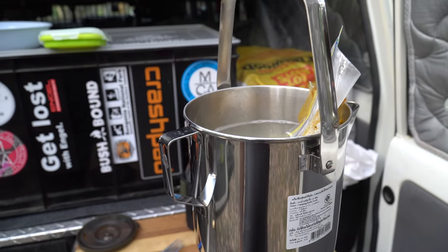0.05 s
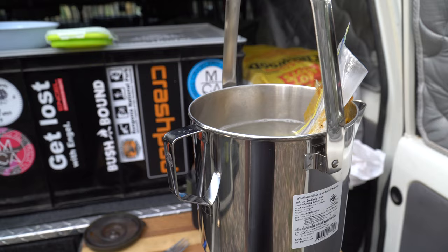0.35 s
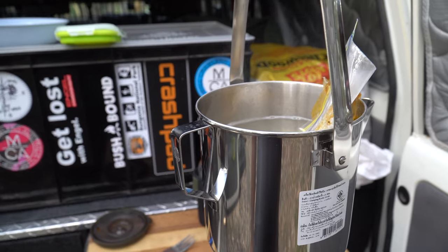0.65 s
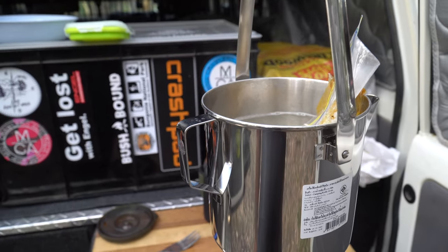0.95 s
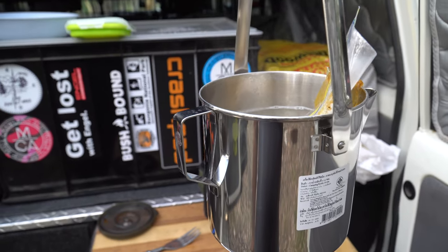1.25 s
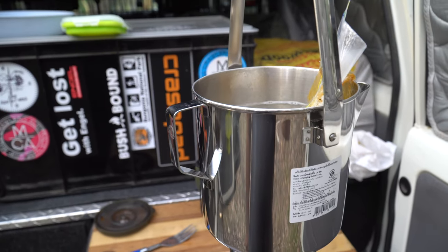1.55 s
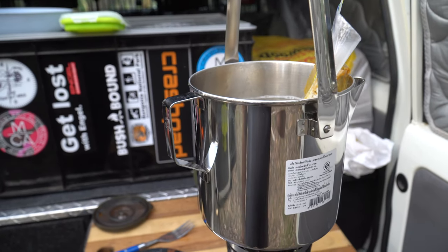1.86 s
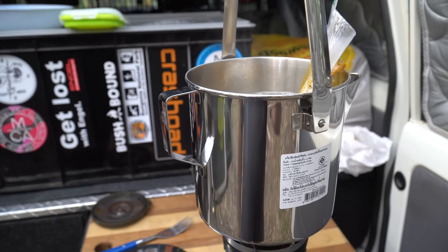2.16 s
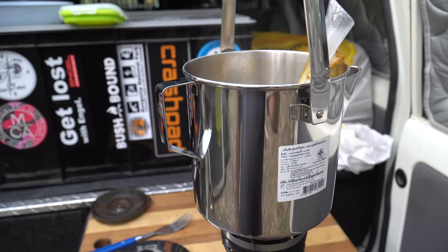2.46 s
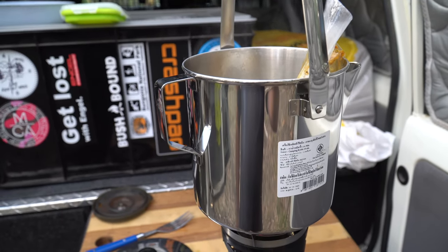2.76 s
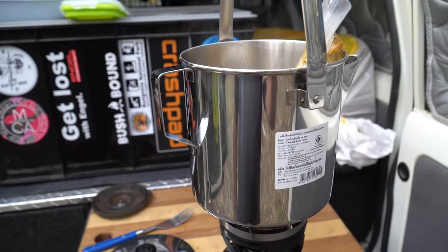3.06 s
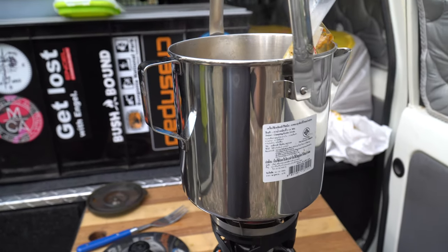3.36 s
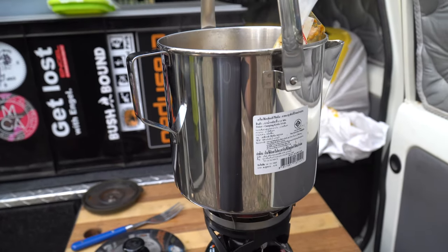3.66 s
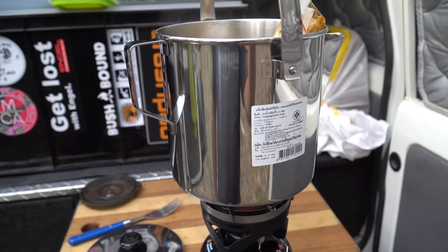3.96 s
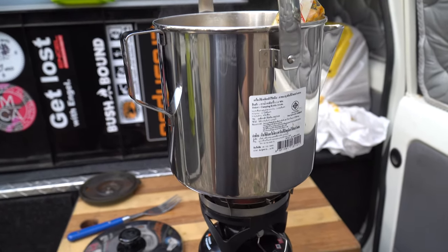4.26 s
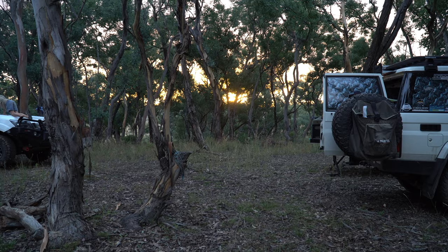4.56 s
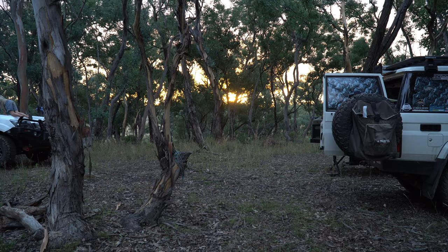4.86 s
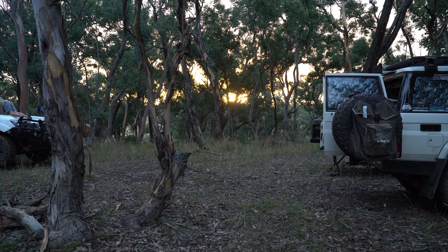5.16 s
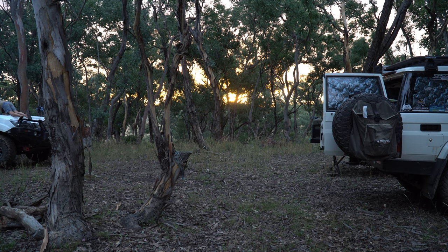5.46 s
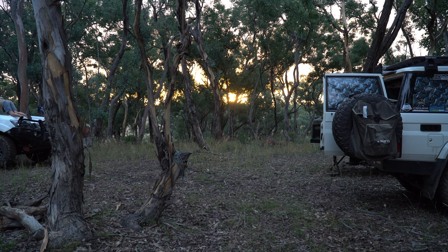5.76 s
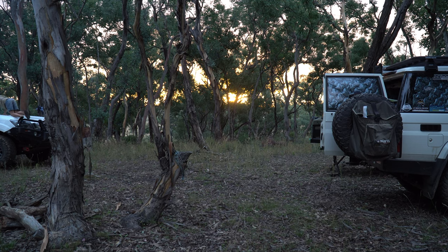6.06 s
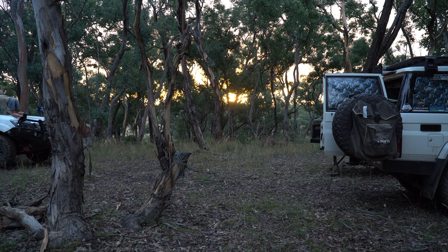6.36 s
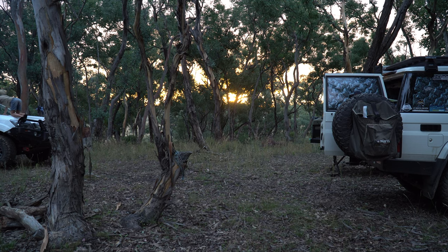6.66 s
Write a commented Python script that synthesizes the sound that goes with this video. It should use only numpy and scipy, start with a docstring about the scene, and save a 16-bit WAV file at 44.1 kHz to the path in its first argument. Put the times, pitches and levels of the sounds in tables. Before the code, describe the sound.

At a bush camp, a gas stove burns close to the moving microphone with a steady roar, a bright hiss, a wavering low drone and small pops. Crickets and a far bird sit behind it. After a sudden cut, a much quieter clearing is filled with pulsing crickets. A faint bird call and a soft bump on the microphone come next, then light rustling and small twig snaps in dry leaf litter.

```python
"""A gas burner roars, hisses and drones under a steel pot at a bush camp, over a bed of crickets.
The flame pulses and sputters, a distant bird calls, the hiss shifts colour as the microphone drifts
past the pot, and a deep flutter passes. At 4.6 s, a faint low rumble spans a hard cut to the quiet
clearing: crickets stroke their wings, one close by, and dry leaves stir. The bird calls again, more
faintly, a soft double bump follows, then grass swishes and twigs snap."""
import sys
import numpy as np
from scipy import signal
from scipy.fft import rfft, irfft, next_fast_len
from scipy.io import wavfile
from scipy.ndimage import map_coordinates

SR = 44100
rng = np.random.default_rng(int(sys.argv[2]) if len(sys.argv) > 2 else 0)


def file_out(sig):
    """Save sig as 16-bit WAV at sys.argv[1]."""
    # one column per channel
    cols = np.atleast_2d(sig).T
    # limit, then scale
    lim = np.clip(cols, -1, 1)
    pcm = np.round(lim * 32767).astype(np.int16)
    wavfile.write(sys.argv[1], SR, pcm)


N = 295911
T = np.arange(N) / SR
CUT_S = 4.576  # the burner gives way to the clearing

# burner faders, dipping as the microphone passes the pot: time_s, roar_db, hiss_db
BURNER_LEVELS = [(0, -27.4, -37), (1.1, -27.2, -36.6), (1.6, -26.4, -36.1), (2.35, -26.8, -35.5),
                 (2.8, -29, -37.7), (3.4, -29.2, -38), (4.1, -27.6, -37.2), (4.55, -27.6, -36.1)]
# tone of the combustion roar: frequency_hz, relative_db
ROAR_SPECTRUM = [(20, -0.5), (34, 0.5), (46, 0.5), (65, -4.5), (110, 2.5), (190, -2.5), (260, -3),
                 (370, -4.5), (500, -10.5), (770, -9), (1150, -12), (1600, -18), (2400, -16), (3300, -24),
                 (4500, -23), (8000, -56)]
# peaks and notches of housing and pot: centre_hz, width_hz, lift_db
HOUSING_RESONANCES = [(244.6, 61, 5), (397, 130, 2.5), (483, 45, -8.5), (520, 22, 4.5), (580, 72, -6),
                      (736, 280, 5.5), (951, 88, -12.5), (1115, 250, 3), (1680, 160, -1.5), (2106, 55, 5.5)]
# tone of the gas jet: frequency_hz, relative_db
JET_SPECTRUM = [(2200, -9), (3200, -8.5), (4200, 11), (5000, 3), (5600, 10), (6200, 9.5), (6800, 5.5),
                (7300, 5.5), (8300, 0), (9700, -3), (10500, 0.5), (12600, -4.5), (13600, -5.5),
                (14100, -11), (15700, -14)]
# bounces off pot, stove and table: first_delay_s, last_delay_s, first_relative_gain, last_relative_gain
JET_ECHOES = [(.000296, .000317, .17, -.07), (.00041, .000407, .03, -.15), (.000632, .000623, -.14, -.13),
              (.000809, .000794, -.11, -.11), (.000893, .000875, .12, .19), (.001049, .001058, .07, .11),
              (.00116, .001091, -.13, .04), (.001406, .001439, .12, .06), (.001784, .001823, -.18, .05),
              (.002144, .002258, .23, -.07), (.0028, .00297, .11, .07), (.00315, .00333, .03, .16)]
# spells of flame pulsing: start_s, length_s, relative_db
PULSE_SPELLS = [(0, 0.7, -10.5), (0.806, .16, -6), (1.193, 1.58, -6.5), (3.038, .46, -6.5),
                (3.65, .82, -13.5)]
# swells of the housing drone: start_s, length_s, level_db
DRONE_SWELLS = [(.3, 0.53, -36.5), (1.196, 0.39, -30.5), (2.11, 0.23, -32), (2.694, 0.37, -36.5),
                (4.15, .4, -34.5)]
# the drone's wavering note: time_s, pitch_hz
DRONE_NOTE = [(.4, 130), (.85, 120), (1.35, 131), (1.9, 124), (2.2, 132.4), (2.5, 124.4), (4.1, 128.2),
              (4.5, 142.9)]
# featured pops of the flame: time_s, peak_db, centre_hz
FLAME_POPS = [(.538, -17, 704), (0.737, -20, 556), (.951, -12.5, 766), (1.047, -15.5, 715),
              (1.189, -20.5, 804), (1.525, -24.5, 1800), (1.69, -20, 782), (1.858, -21, 2960),
              (2.024, -20, 599), (2.364, -23, 564), (2.46, -17, 730), (2.474, -23, 1990), (2.665, -18, 313),
              (3.116, -17, 766), (3.155, -20.5, 1643), (3.575, -24, 718), (3.885, -23, 950)]
# housing and jet resonances, loudest in passing: pass_s, level_db, pitch_hz, glide_hz_per_s, fade_db_per_s
PASSING_WHISTLES = [(2.85, -39.5, 358, 0, 12), (.5, -44.5, 6970, -15, 6), (2.0, -41, 6880, -25, 6),
                    (1.1, -43.5, 6520, 0, 4), (2.0, -51, 9200, -150, 7), (.6, -53.5, 10280, -30, 8),
                    (1.9, -50.5, 10480, 0, 14), (3.1, -55, 10300, -100, 12), (3.9, -51.5, 10540, -140, 9),
                    (3.6, -47.5, 5740, -30, 5), (4.4, -54, 8320, -60, 12), (4.4, -58, 13400, -60, 12)]
# fader of the crickets behind the stove: time_s, relative_db
STOVE_CHORUS_LEVELS = [(0, -31), (2.3, -32), (3.5, -35), (4.55, -33)]
# tempo of the nearest cricket: time_s, strokes_per_s
WING_TEMPO = [(4.593, 20.33), (5.65, 20.33), (5.8, 20.05), (6.7, 20.05)]
# distant bird calls: lowest_pitch_time_s, lowest_pitch_hz, level_db
BIRD_CALLS = [(.685, 1324, -36), (5.625, 1290, -50.5)]
# tone of the leaf litter: frequency_hz, relative_db
LEAF_SPECTRUM = [(100, 11.5), (400, 3.5), (700, -0.5), (1250, 3), (1900, -1), (2600, 2.5), (3400, 5.5),
                 (4700, -7), (5400, -3), (6000, -8), (6700, -16.5), (9000, -21), (12000, -15), (15700, -29)]
# rustles in the litter: start_s, length_s, relative_db
LEAF_RUSTLES = [(4.583, 0.29, -68), (5.294, 0.24, -57), (5.738, .22, -57), (6.14, .38, -55.5),
                (6.594, .12, -58.5)]
# tone of dry grass: frequency_hz, relative_db
GRASS_SPECTRUM = [(3000, -19), (5000, 1), (5500, 0), (6500, -16), (12000, -18), (15700, -28)]
# one bright swish of grass: start_s, length_s, level_db
GRASS_SWISH = (6.1, 0.11, -55)
# dry twigs and leaves snapping: time_s, peak_db, centre_hz
TWIG_SNAPS = [(5.067, -43.5, 400), (5.851, -37, 5560), (6.195, -46, 5500), (6.257, -40, 1400),
              (6.289, -40, 2000), (6.381, -45, 1490), (6.396, -37, 1390), (6.403, -34, 1390),
              (6.521, -42, 2500), (6.612, -43, 5500), (6.643, -43, 1500), (6.685, -39, 1200)]
# the two hits of the soft bump: start_s, level_db, decay_s
BUMP_HITS = [(5.749, -29.5, 0.02), (5.772, -32, 0.017)]
# dull tone of the bump: frequency_hz, relative_db
BUMP_SPECTRUM = [(25, 14), (60, 2), (130, 7), (230, 1), (370, 1), (600, -9), (1100, -7), (2000, -15),
                 (3000, -7), (5500, -20), (8000, -37), (15000, -42)]
# deep flutters, one at the stove and a faint one across the cut: start_s, length_s, level_db
DEEP_FLUTTERS = [(2.46, 0.15, -23.5), (4.56, 0.12, -39)]
# tone of the clearing's air: frequency_hz, relative_db
AIR_SPECTRUM = [(25, 12.5), (55, 10), (100, 1.5), (300, 0.5), (600, -4), (1200, -6), (2000, -11),
                (3000, -9.5), (4800, -8), (6500, -22), (12000, -18.5), (15700, -29)]


def roar():
    """Turbulent combustion roars through the housing with a quick flutter."""
    flutter_db = 0.66 * wander(43) + 0.37 * wander(6.4)
    return amp(follow(BURNER_LEVELS)) * unit(noise(ROAR_SPECTRUM, HOUSING_RESONANCES) * amp(flutter_db))


def hiss(echo_strength=0.75):
    """Gas leaves the jet; short echoes comb-filter it, and the teeth slide as the microphone moves."""
    jet, travel = noise(JET_SPECTRUM), np.minimum(T / CUT_S, 1)
    for first_s, last_s, first_gain, last_gain in JET_ECHOES:
        delay_s = first_s + (last_s - first_s) * travel
        gain = echo_strength * (first_gain + (last_gain - first_gain) * travel)
        jet = jet + gain * map_coordinates(jet, [(T - delay_s) * SR], order=5)
    return amp(follow(BURNER_LEVELS, column=2) + 0.67 * wander(40)) * unit(jet)


def flicker(rate_hz=11.3, unsteadiness=0.141, trim_db=-.5):
    """The whole flame pulses in spells: a pressure wave below hearing."""
    turns = np.cumsum(rate_hz * (1 + unsteadiness * wander(8.3))) / SR
    strength = swells(PULSE_SPELLS, attack_s=0.073, release_s=0.12)
    return amp(trim_db + 1.6 * wander(10.4)) * strength * np.sin(2 * np.pi * turns)


def drone(width_hz=27, octave_db=-17, rest_db=-39):
    """The flame drives the air in the housing into an unsteady, swelling note with a weak octave."""
    strength = amp(rest_db) + swells(DRONE_SWELLS, attack_s=.12, release_s=0.096)
    hz = follow(DRONE_NOTE)
    return strength * (fuzzy_note(hz, width_hz) + amp(octave_db) * fuzzy_note(2 * hz, 2 * width_hz))


def sputters(small_count=60, small_db=-29):
    """Pockets of gas catch with a soft pop: a few large, many small."""
    out = np.zeros(N)
    for s, db, hz in FLAME_POPS:
        add(out, s - .002, amp(db) * burst(hz, decay_s=0.0015, spread=0.49))
    for when, size, pitch in rng.random((small_count, 3)):
        pop = burst(500 + 500 * pitch, decay_s=0.0027, spread=0.38)
        add(out, when * CUT_S, amp(small_db + 2.9 * size) * pop)
    return out


def whistles():
    """Narrow resonances sing out of the noise, gliding and fading as the microphone moves on."""
    out = np.zeros(N)
    for s, db, hz, glide, fade in PASSING_WHISTLES:
        width_hz = 70 * (hz / 7000) ** .35  # higher ones are wider
        out += amp(db - fade * abs(T - s)) * fuzzy_note(hz + glide * (T - s), width_hz)
    return out


def crickets_at_stove():
    """The bed of crickets behind the burner."""
    bed = chorus(4115, spread_hz=500, fall=.11, duty=.32, edge_drop_db=19, wet=0.56, overtone_db=-39)
    return amp(follow(STOVE_CHORUS_LEVELS) + 1.5) * bed


def crickets_in_clearing(bed_db=-38.5, rise_db_per_s=2):
    """A swelling chorus, with one lower-pitched cricket up close and a fainter, deeper one."""
    bed = chorus(4050, spread_hz=390, fall=0.097, duty=.3, edge_drop_db=14, wet=0.3, overtone_db=-36)
    far = amp(bed_db + rise_db_per_s * (T - CUT_S)) * bed
    strokes = np.cumsum(follow(WING_TEMPO)) / SR
    strokes -= np.interp(WING_TEMPO[0][0], T, strokes)  # a stroke lands on the first cue
    near = amp(-38) * cricket(strokes, 3710, fall=0.137, duty=0.37, overtone_db=-26)
    deep = amp(-48) * cricket(19.2 * T, 3370, fall=0.13, duty=.5)
    return far + trees(near + deep, t60_s=0.46, wet=0.73)


def chorus(centre_hz, spread_hz, fall, duty, edge_drop_db, wet, overtone_db, count=32):
    """Crickets near and far stridulate out of step at nearly one tempo, each on its own pitch."""
    out, drift = np.zeros(N), wander(1.5)
    places = np.linspace(-1, 1, count)  # from the lowest voice to the highest
    starts = np.arange(count) * (np.sqrt(5) - 1) / 2  # spread evenly over one stroke
    for place, start, (pace, shift) in zip(places, starts, rng.random((count, 2))):
        strokes_per_s = 19.4 + .08 * (pace - .5)
        strokes = start + strokes_per_s * T + .05 * np.roll(drift, int(shift * N))
        voice = cricket(strokes, centre_hz + spread_hz * place, fall, duty, overtone_db)
        out += amp(-edge_drop_db * place ** 2) * voice
    return unit(trees(out, t60_s=1.0, wet=wet))


def cricket(strokes, hz, fall, duty, overtone_db=-60):
    """Each wing stroke is one tone pulse that sinks in pitch as the wing slows; no two are quite alike."""
    sounding = abs((strokes + .5) % 1 - .5) < duty / 2
    number = np.round(strokes[sounding]).astype(int)
    progress = (strokes[sounding] - number) / duty  # -0.5 to 0.5 across a pulse
    start, detune, size = rng.standard_normal((512, 3))[number].T
    pitch_hz = hz * (1 + .008 * detune - fall * progress)
    phase = 2 * np.pi * (start + np.cumsum(pitch_hz) / SR)
    tone = np.sin(phase) + amp(overtone_db) * np.sin(2 * phase)
    out = np.zeros(N)
    out[sounding] = amp(1.4 * size) * np.cos(np.pi * progress) * tone
    return out


def bird(length_s=0.17, lead_s=.13, scoop_hz_per_s2=52000, hoarseness=.05):
    """A hoarse whistle scoops down as it swells and fades, blurred by the trees."""
    out, t = np.zeros(N), np.arange(0, length_s, 1 / SR)
    for s, low_hz, db in BIRD_CALLS:
        scoop_hz = low_hz + scoop_hz_per_s2 * (t - lead_s) ** 2
        hz = scoop_hz * (1 + hoarseness * wander(370)[:len(t)])
        arch = np.sin(np.pi * t / length_s)
        add(out, s - lead_s, amp(db) * arch * np.sin(2 * np.pi * np.cumsum(hz) / SR))
    return trees(out, t60_s=1.0, wet=0.87)


def undergrowth():
    """Leaf litter stirs faintly and rustles now and then; grass swishes and twigs snap."""
    stir = amp(-67) + swells(LEAF_RUSTLES, attack_s=0.1, release_s=0.046)
    crinkle = unit(noise(LEAF_SPECTRUM) * amp(1.6 * wander(200)))
    out = amp(4.5) * stir * crinkle
    out += swells([GRASS_SWISH], attack_s=0.067, release_s=.04) * noise(GRASS_SPECTRUM)
    for s, db, hz in TWIG_SNAPS:
        add(out, s, amp(db) * burst(hz, decay_s=0.0011, spread=0.55))
    return out


def bump(attack_s=0.0023, sway_hz=13, sway_db=-21):
    """A soft double bump sets the microphone swaying."""
    out = np.zeros(N)
    for s, db, decay_s in BUMP_HITS:
        age = np.maximum(T - s, 0)
        out += amp(db) * noise(BUMP_SPECTRUM) * (1 - np.exp(-age / attack_s)) * np.exp(-age / decay_s)
    age = np.maximum(T - BUMP_HITS[0][0], 0)
    return out + amp(sway_db) * np.sin(2 * np.pi * sway_hz * age) * np.exp(-age / 0.11)


def deep_flutters():
    """A brief, deep flutter at the stove, and a faint low rumble across the cut."""
    strength = swells(DEEP_FLUTTERS, attack_s=0.039, release_s=0.072)
    return strength * noise([(20, -3), (32, -2), (48, -13), (90, -38), (200, -70)])


def air():
    """The clearing's faint air tone over a sub-bass rumble."""
    tone = amp(-52.5) * noise(AIR_SPECTRUM)
    rumble = amp(-42.5) * noise([(8, -4), (17, 0), (24, -16), (60, -31), (200, -78)])
    return tone + rumble


def trees(sound, t60_s, wet):
    """Trunks scatter a sound into a thin, dying reverb tail."""
    t = np.arange(SR // 2) / SR
    taps = rng.standard_normal(len(t)) * (rng.random(len(t)) < 1 / 20) * amp(-60 * t / t60_s)
    return sound + wet * signal.fftconvolve(sound, taps / np.linalg.norm(taps))[:N]


def fuzzy_note(hz, width_hz):
    """Turbulence in a narrow resonance that follows the curve hz; rms 1."""
    phase = 2 * np.pi * np.cumsum(hz) / SR
    return unit(wander(width_hz) * np.cos(phase) + wander(width_hz) * np.sin(phase))


def burst(hz, decay_s, spread):
    """A short puff of noise around hz; peak 1."""
    t = np.arange(SR // 10) / SR
    edges_hz = np.clip([hz / (1 + spread), hz * (1 + spread)], 20, SR / 2 - 100)
    puff = rng.standard_normal(len(t)) * t * np.exp(-t / decay_s)
    puff = signal.sosfilt(signal.butter(3, edges_hz, "band", fs=SR, output="sos"), puff)
    return puff / abs(puff).max()


def noise(spectrum, resonances=()):
    """Noise with an EQ curve of (frequency_hz, relative_db) points, plus peaks and notches; rms 1."""
    hz = np.fft.rfftfreq(next_fast_len(N), 1 / SR)
    points_hz, points_db = np.transpose(sorted(spectrum))
    db = np.interp(np.log(hz + 1), np.log(points_hz), points_db)
    for centre, width, lift in resonances:
        db = db + lift / (1 + (2 * (hz - centre) / width) ** 2)
    white = rfft(rng.standard_normal(next_fast_len(N)))
    return unit(irfft(white * amp(db) * (hz > points_hz[0] / 2))[:N])


def wander(per_s):
    """Smooth random modulation, moving up to about per_s times a second; rms 1."""
    hz = np.fft.rfftfreq(next_fast_len(N), 1 / SR)
    white = rfft(rng.standard_normal(next_fast_len(N)))
    return unit(irfft(white * np.exp(-(hz / per_s) ** 2))[:N])


def swells(cues, attack_s, release_s):
    """An envelope in which each cue rises, holds until its length is over, and dies away."""
    out = np.zeros(N)
    for start_s, length_s, db in cues:
        age = T - start_s
        out += amp(db) * np.clip(age / attack_s, 0, 1) * np.exp(-np.maximum(age - length_s, 0) / release_s)
    return out


def follow(rows, column=1):
    """One column of an automation curve at every sample."""
    rows = np.asarray(rows)
    return np.interp(T, rows[:, 0], rows[:, column])


def add(mix, s, sound):
    """Mixes a sound in at time s."""
    part = mix[max(round(s * SR), 0):][:len(sound)]
    part += sound[:len(part)]


def amp(db):
    """Decibels to gain."""
    return 10 ** (np.asarray(db) / 20)


def unit(x):
    """Scales to rms 1."""
    return x / np.sqrt(np.mean(x ** 2) + 1e-20)


def scene(crossfade_s=0.0064):
    """The stove cuts to the clearing; the bird and the deep flutters play over both."""
    stove = roar() + drone() + flicker() + hiss() + whistles() + sputters() + crickets_at_stove()
    clearing = crickets_in_clearing() + air() + bump() + undergrowth()
    at_stove = np.clip((CUT_S - T) / crossfade_s + .5, 0, 1)
    return (at_stove * stove + (1 - at_stove) * clearing + bird() + deep_flutters())[None]


def record(dry):
    """A steep low-pass trims the very top of the mix."""
    cutoff_hz = 15720
    low_pass = signal.firwin(1023, cutoff_hz, window=("kaiser", 9), fs=SR)
    return signal.oaconvolve(dry, low_pass[None], "same")


dry = scene()
out = record(dry)
file_out(out)
```